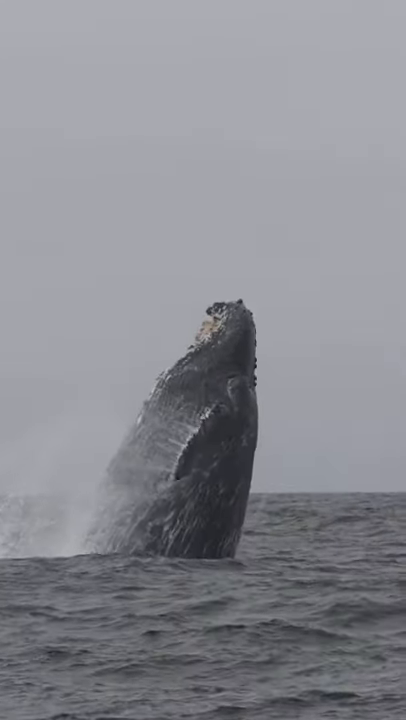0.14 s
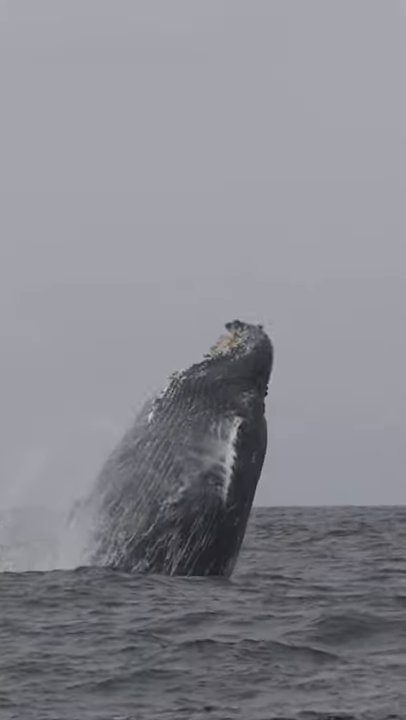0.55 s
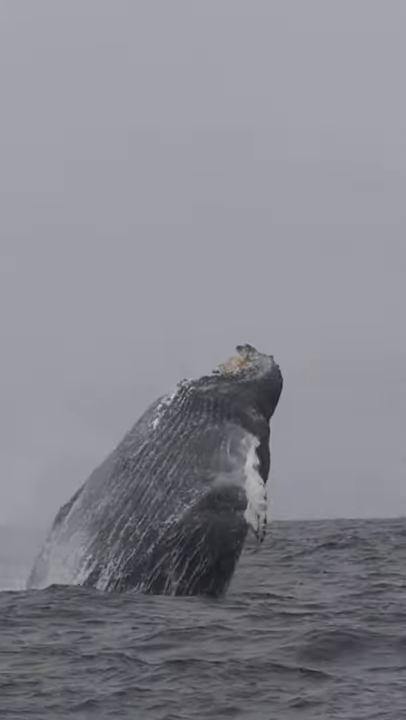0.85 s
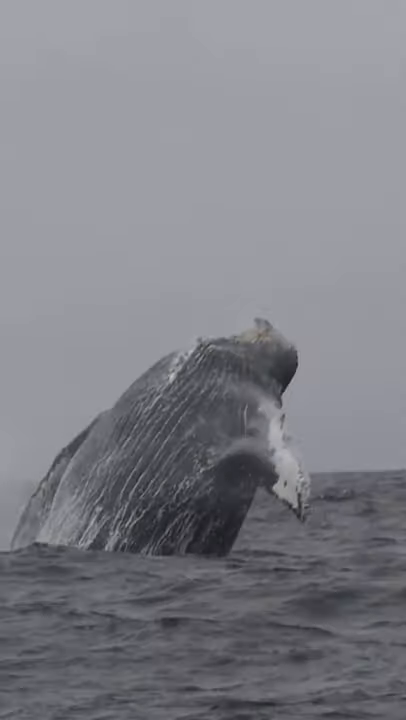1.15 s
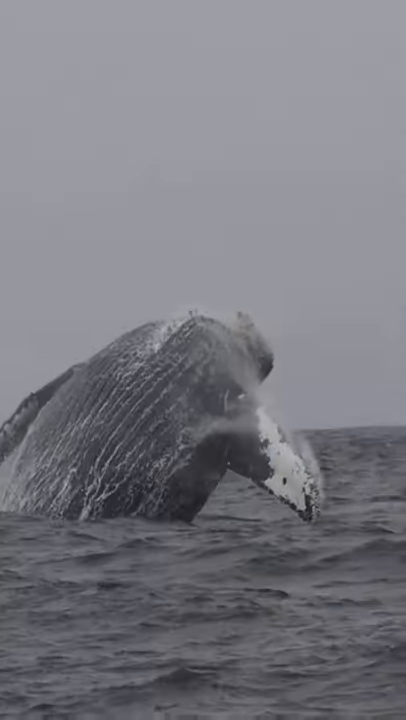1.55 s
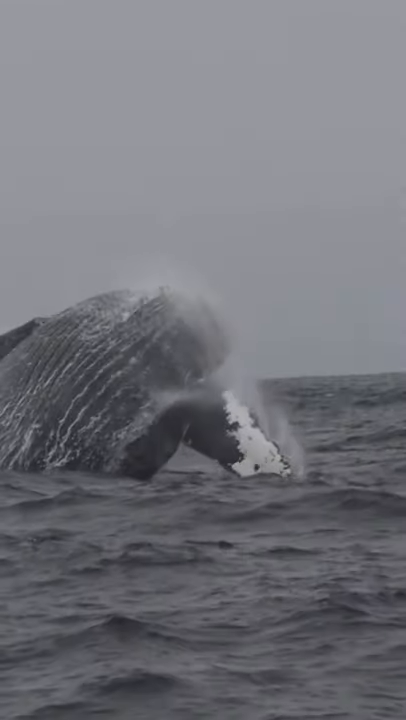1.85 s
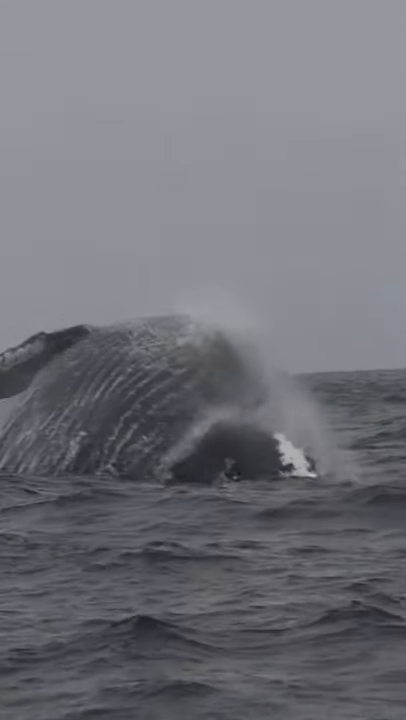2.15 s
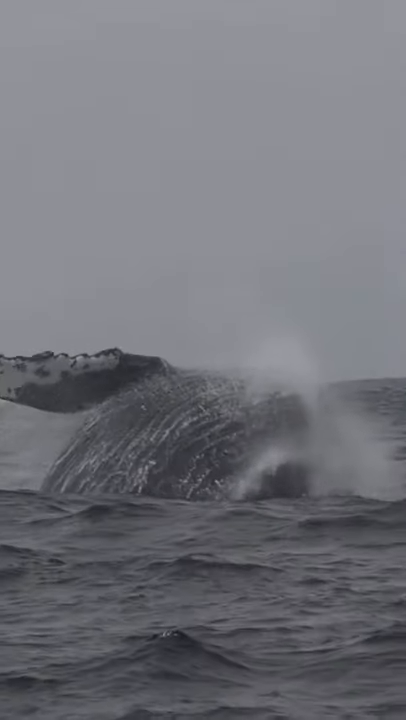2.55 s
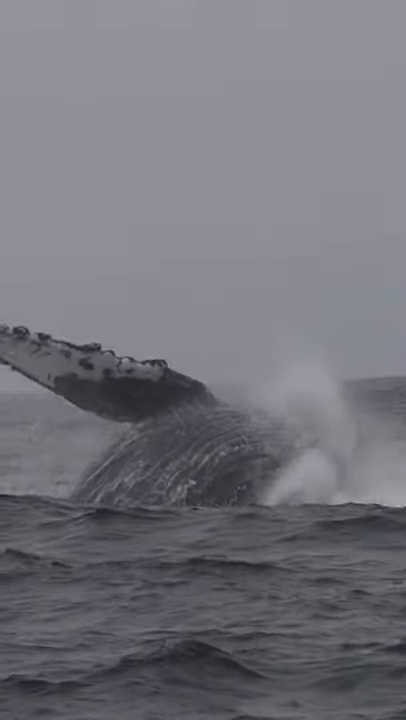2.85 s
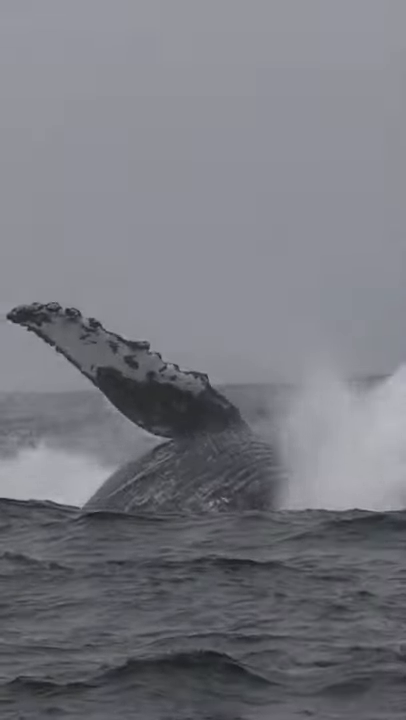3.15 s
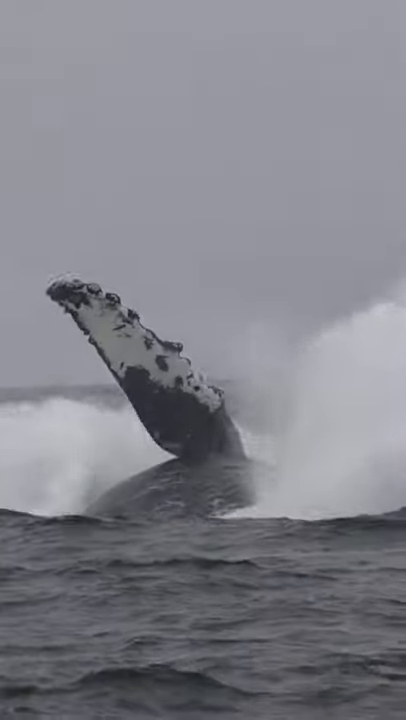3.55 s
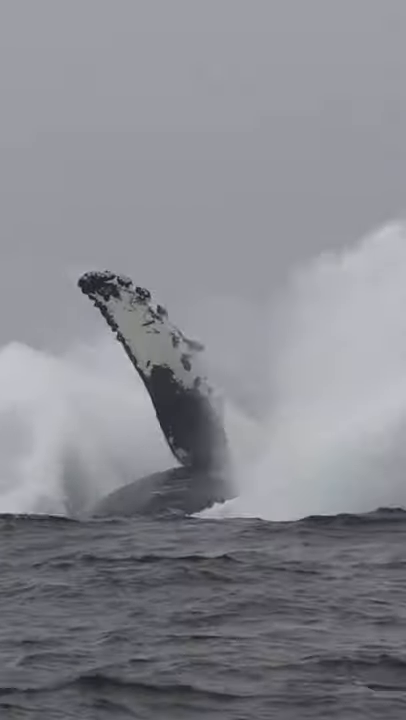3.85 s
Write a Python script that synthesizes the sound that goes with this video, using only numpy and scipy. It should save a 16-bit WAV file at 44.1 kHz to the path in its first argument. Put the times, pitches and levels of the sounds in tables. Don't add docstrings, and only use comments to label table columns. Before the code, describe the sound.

Big whale splashdown: steady water wash, growing low rumble, sharp slap, then heavy booms and foam hiss

```python
import sys
import numpy as np
from scipy import signal
from scipy.fft import rfft, irfft
from scipy.io import wavfile
from scipy.ndimage import uniform_filter1d

SR = 44100
rng = np.random.default_rng(int(sys.argv[2]) if len(sys.argv) > 2 else 0)


def wav_out(sig):
    wavfile.write(sys.argv[1], SR, np.round(np.clip(np.atleast_2d(sig).T, -1, 1) * 32767).astype(np.int16))


def ratio_of_db(decibels):
    return 10 ** (np.asarray(decibels, float) / 20)


N = 176400

# (time [s], level [dB])
WASH_LEVEL = [
    (0, -42),
    (.5, -40.5),
    (1.4, -39.5),
    (2.1, -38),
    (2.7, -35.5),
    (3.3, -35),
    (4, -33.5),
]
# (frequency [Hz], density [dB per Hz])
WASH_SPECTRUM = [(25, -10), (90, -4.5), (300, -3), (750, -10), (1900, -19.5), (3600, -22.5), (7800, -36.5),
                 (10000, -55)]
# (frequency [Hz], shared power [0-1])
WASH_COHERENCE = [(60, .5), (200, .7), (1300, .62), (2500, .8), (2750, .1), (4000, .1), (4300, .75),
                  (9000, .5)]
# (time [s], level [dB])
SURGE_LEVEL = [
    (.5, -56),
    (1.45, -42),
    (1.95, -34.5),
    (2.3, -27),
    (3.02, -22.5),
    (3.15, -24),
    (3.4, -24),
    (3.78, -21),
    (3.86, -28),
]
SURGE_SPECTRUM = [(18, -6), (30, -1), (60, -5.5), (100, -7.5), (200, -14), (400, -31), (800, -45)]  # (frequency [Hz], density [dB per Hz])
# (time [s], level [dB])
BOOM_LEVEL = [
    (2.2, -45),
    (2.6, -38),
    (2.99, -41),
    (3.06, -26),
    (3.3, -20),
    (3.56, -26.5),
    (3.68, -23),
    (3.82, -19),
    (3.87, -26.5),
]
BOOM_SPECTRUM = [(40, -11.5), (80, -8), (140, -3.5), (200, -5), (300, -13.5), (600, -31.5)]  # (frequency [Hz], density [dB per Hz])
# (time [s], peak [dB], pitch [Hz])
AIR_POCKETS = [(3.18, -14.5, 45), (3.345, -17, 111), (3.463, -13.5, 50.6), (3.525, -18, 44.6),
               (3.587, -9, 50), (3.649, -15.5, 99), (3.683, -8, 134), (3.709, -9, 38), (3.769, -13, 48),
               (3.799, -13, 118), (3.96, -11, 72.4)]
# (start [s], level [dB], attack [s], hold [s], 60 dB release [s])
SLAP_ENVELOPE = (2.780, -28, .008, .024, .2)
SPRAY_ENVELOPE = (2.80, -30.5, .1, .17, .6)
FOAM_ENVELOPE = (3.62, -35, .25, .06, 1.2)
# (frequency [Hz], density [dB per Hz])
SLAP_SPECTRUM = [(400, -5), (830, -2), (1640, -9.5), (4600, -14), (7500, -20), (10000, -31)]
SPRAY_SPECTRUM = [(400, -2), (800, -7.5), (2400, -11.5), (4400, -16), (7000, -25), (10000, -39)]
FOAM_SPECTRUM = [(500, -4.5), (1500, -17.5), (3200, -14.5), (5200, -19.5), (7800, -30), (10000, -48.5)]
# (frequency [Hz], shared power [0-1])
SURGE_COHERENCE = [(30, 0.37), (200, 0.4)]
BOOM_COHERENCE = [(60, 0.99), (300, 0.99)]
SLAP_COHERENCE = [(600, 0.73), (5000, 1.0)]
SPRAY_COHERENCE = [(600, 0.5), (5000, 0.7)]
FOAM_COHERENCE = [(600, 0.39), (2500, 0.52), (3300, 0.23), (5000, 0.59)]

LEFT_LAG_S = 0.000034


def level_curve(table, t):
    a = np.array(table, float)
    return ratio_of_db(np.interp(t, a[:, 0], a[:, 1], left=-120))


def burst(t, start, db, attack, hold, t60):
    u = t - start
    decay_db = 60 * np.maximum(u - attack - hold, 0) / t60
    return ratio_of_db(db - decay_db) * np.clip(u / attack, 0, 1)


def random_walk(rate_hz):
    k = int(SR / rate_hz)
    held = np.repeat(rng.standard_normal(N // k + 1), k)
    return uniform_filter1d(uniform_filter1d(held, k), k)[:N]


def droplet_noise(share):
    drops_per_s, spread_db = 4000, 2.5
    hit = rng.random(N) < drops_per_s / SR
    size = ratio_of_db(spread_db * np.minimum(rng.exponential(size=N), 4))
    clicks = hit * rng.choice([-1, 1], N) * size
    share = np.clip(share, 0, 1)
    return np.sqrt(1 - share) * rng.standard_normal(N) + np.sqrt(share) * clicks / clicks.std()


def water(spectrum, coherence, pan_db, lag_s, swell_db, flick_db, grain):
    f = np.maximum(np.arange(N // 2 + 1) * SR / N, 1)
    c = np.array(spectrum, float)
    gain_db = np.interp(np.log(f), np.log(c[:, 0]), c[:, 1])
    gain_db -= 18 * np.maximum(np.log2(c[0, 0] / f), 0)
    gain_db -= 43 * np.maximum(np.log2(f / c[-1, 0]), 0)
    gain = ratio_of_db(gain_db)
    k = np.array(coherence, float)
    same = np.clip(np.interp(np.log(f), np.log(k[:, 0]), k[:, 1]), 0, 1)
    both, left, right = (rfft(droplet_noise(grain)) for _ in range(3))
    delay = np.array([np.exp(-2j * np.pi * f * lag_s), np.ones(len(f))])
    shared = np.sqrt(same) * both * delay
    separate = np.sqrt(1 - same) * np.array([left, right])
    pair = gain * (shared + separate)
    out, swell = 0, random_walk(1.6)
    for octave in range(4, 15, 2):
        mask = np.cos(np.pi / 2 * np.clip((np.log2(f) - octave) / 2, -1, 1)) ** 2
        if (gain * mask).max() > 2e-2 * gain.max() * 2.0 ** (4 - octave):
            out = out + irfft(pair * mask, N) * ratio_of_db(swell_db * swell + flick_db * random_walk(13))
    return out / out.mean(0).std() * ratio_of_db(np.array([[pan_db], [-pan_db]]) / 2)


def wash(t):
    sea = water(WASH_SPECTRUM, WASH_COHERENCE, 3.5, LEFT_LAG_S, 0.26, 0.62, 0.15)
    return level_curve(WASH_LEVEL, t) * ratio_of_db(7) * sea


def foam(t):
    hiss = water(FOAM_SPECTRUM, FOAM_COHERENCE, 7.2, LEFT_LAG_S, 0, 0.58, 0.2)
    return burst(t, *FOAM_ENVELOPE) * ratio_of_db(-1.7) * hiss


def spray(t):
    rain = water(SPRAY_SPECTRUM, SPRAY_COHERENCE, 1.2, 0, 0, 1.0, 0.27)
    return burst(t, *SPRAY_ENVELOPE) * ratio_of_db(-0.3) * rain


def slap(t):
    flutter_hz, flutter_db = 193, 4.5
    depth = np.clip((t - 2.79) / 0.015, 0, 1) * (t < 2.83)
    flutter = ratio_of_db(flutter_db * np.cos(2 * np.pi * flutter_hz * (t - 2.811)) * depth)
    splash = water(SLAP_SPECTRUM, SLAP_COHERENCE, -0.6, 0, 0, 0.34, 0.47)
    return burst(t, *SLAP_ENVELOPE) * ratio_of_db(0.35) * flutter * splash


def thuds(t):
    width_cycles = 0.55
    out = np.zeros(N)
    for at, db, hz in AIR_POCKETS:
        cycles = (t - at) * hz
        out -= ratio_of_db(db) * np.cos(2 * np.pi * cycles) * np.exp(-0.5 * (cycles / width_cycles) ** 2)
    return out


def boom(t):
    cavity = water(BOOM_SPECTRUM, BOOM_COHERENCE, 1.0, 0, 0, 1.2, 0)
    return level_curve(BOOM_LEVEL, t) * ratio_of_db(-2) * cavity


def surge(t):
    rumble = water(SURGE_SPECTRUM, SURGE_COHERENCE, -1.4, 0, 0, 1.1, 0)
    return level_curve(SURGE_LEVEL, t) * rumble


def scene():
    t = np.arange(N) / SR
    return wash(t) + foam(t) + spray(t) + slap(t) + thuds(t) + boom(t) + surge(t)


def roll_off(x):
    return signal.sosfilt(signal.butter(12, 10110, fs=SR, output="sos"), x)


def record(dry):
    rounded = np.tanh(1.3 * dry) / 1.3
    top_cut = signal.ellip(8, 0.2, 80, 10000, fs=SR, output="sos")
    mix = signal.sosfilt(top_cut, rounded)
    return roll_off(mix)


dry = scene()
out = record(dry)
wav_out(out)
```